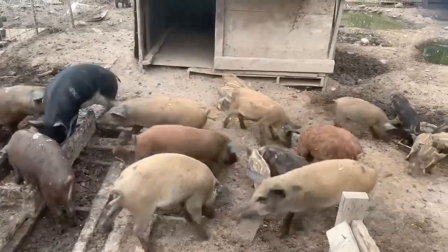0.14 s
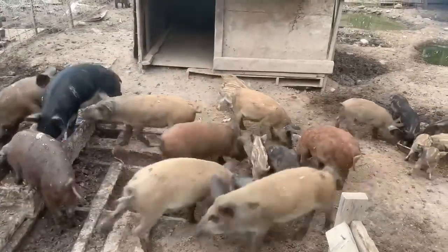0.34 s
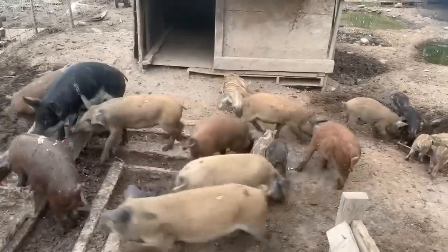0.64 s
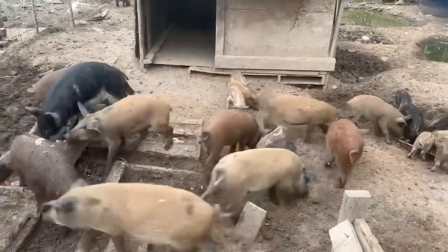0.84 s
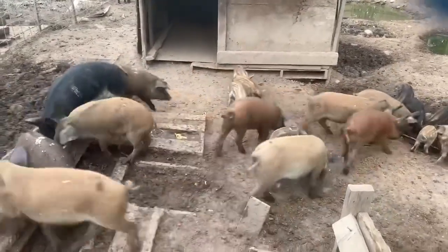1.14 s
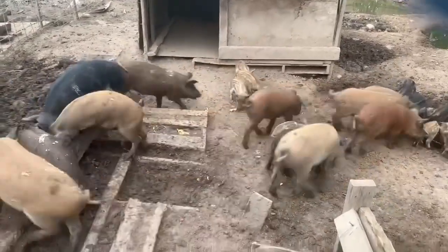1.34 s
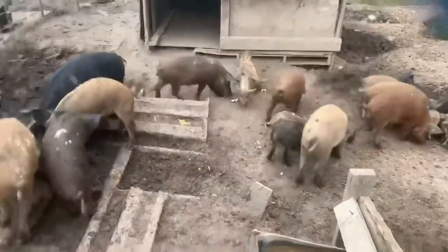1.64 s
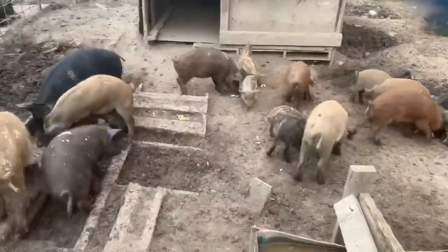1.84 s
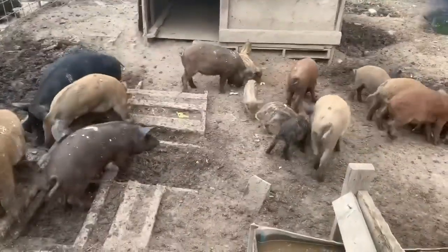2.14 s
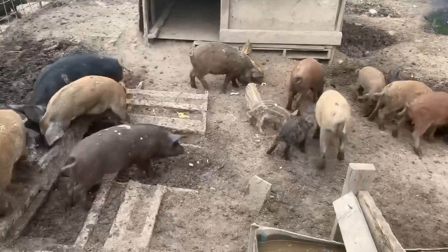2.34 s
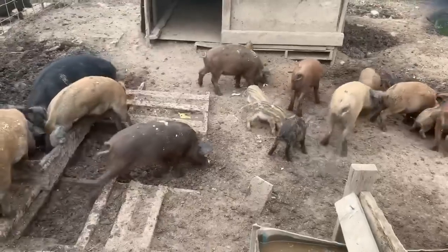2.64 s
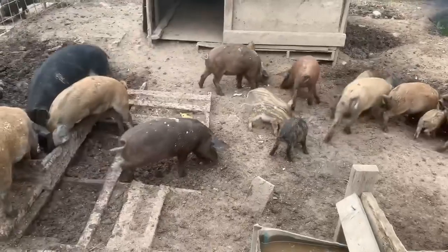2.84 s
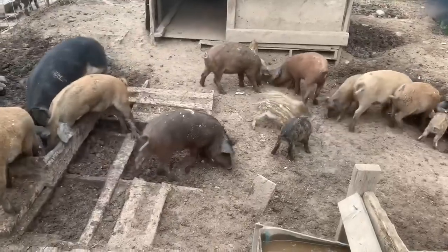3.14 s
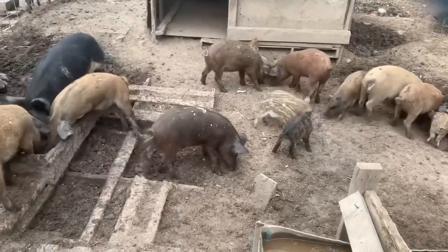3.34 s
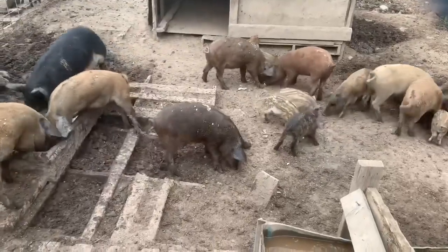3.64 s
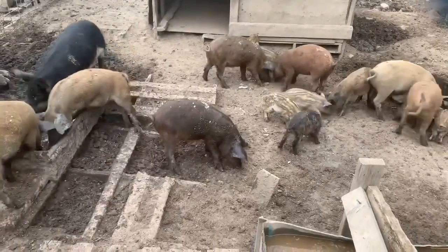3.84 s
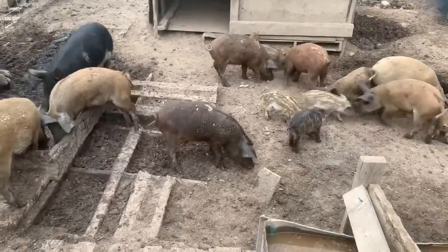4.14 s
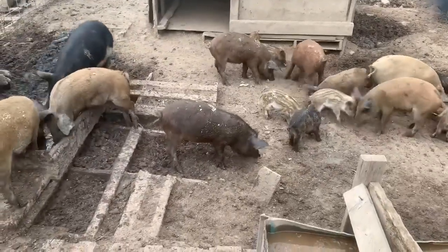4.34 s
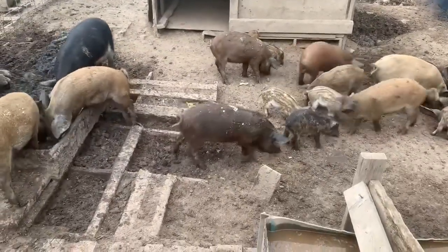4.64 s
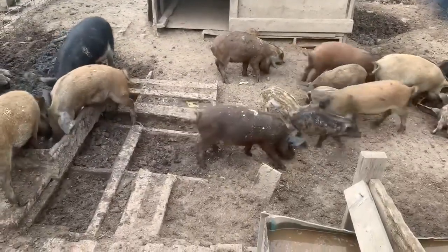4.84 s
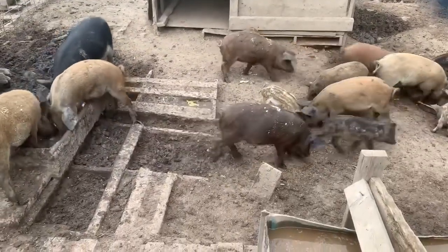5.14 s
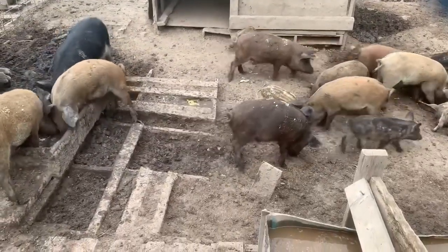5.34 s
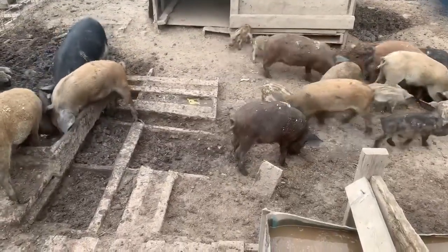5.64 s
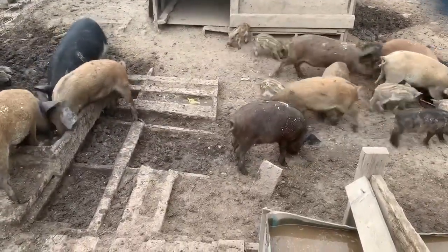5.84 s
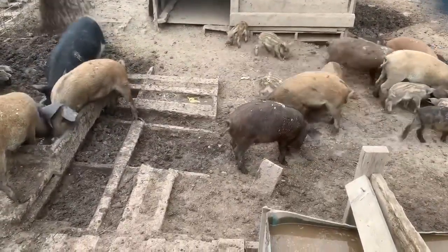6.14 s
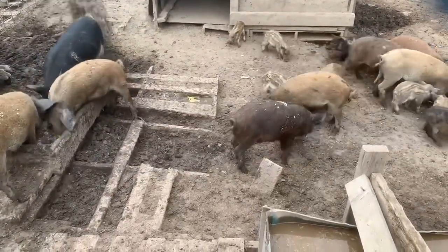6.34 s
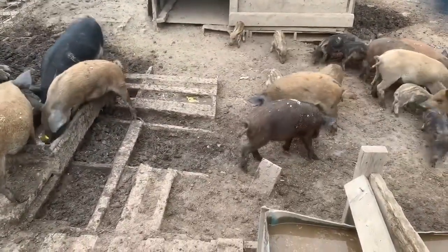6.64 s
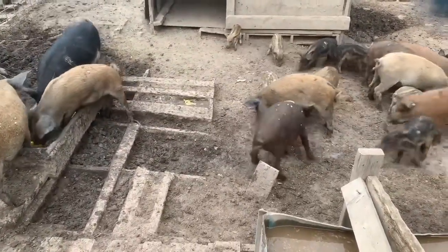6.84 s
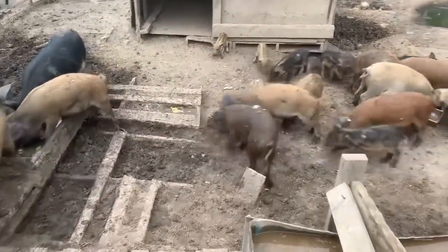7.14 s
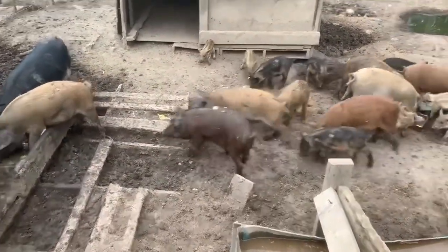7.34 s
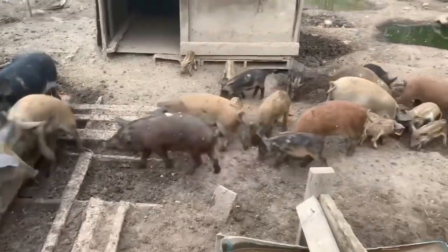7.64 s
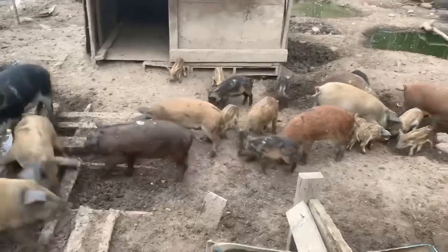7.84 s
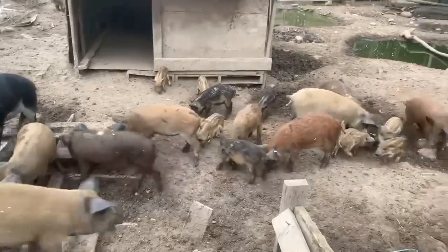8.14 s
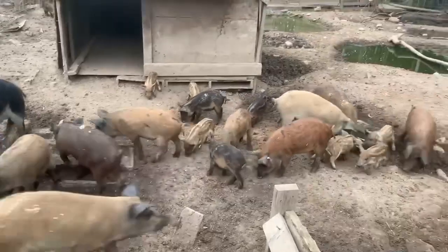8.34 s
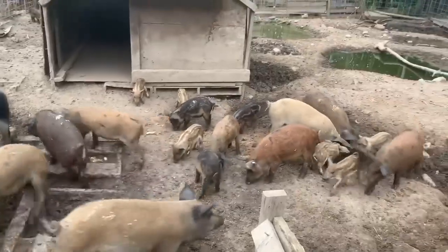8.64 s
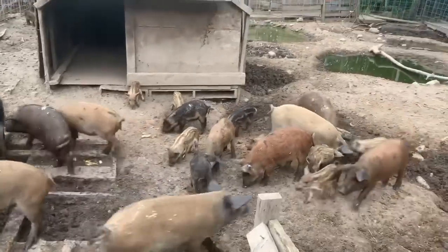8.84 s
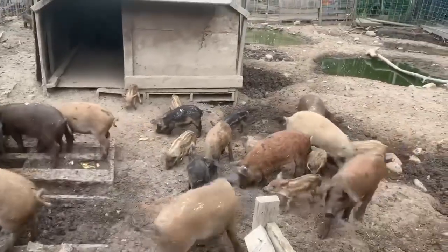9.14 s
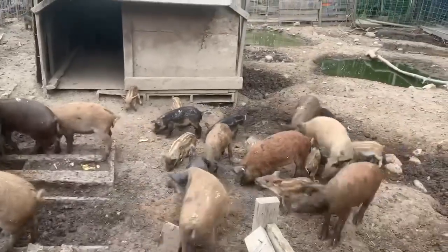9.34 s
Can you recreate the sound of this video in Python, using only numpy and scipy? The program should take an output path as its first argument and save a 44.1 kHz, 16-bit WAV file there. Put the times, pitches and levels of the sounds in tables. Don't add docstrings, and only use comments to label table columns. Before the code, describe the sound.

Outdoors, a herd of pigs feeds beside a wooden trough, heard close in stereo with very short echoes. A steady bed of deep murmuring, mid-pitched rooting rustle, faint airy sniffing and scattered tiny munches lasts throughout. From 0 to 1 s come wet smacks, a loud one on the right at 0.35, and brief raspy grunts from a younger pig. At 1.1 a loud crack, thump and clack hit wood; another wet smack follows at 1.3. Around 2 s a boomy knock meets a longer grunt and a cluster of smacks. Low fluttering grunts continue at 2.5, 2.8, 3.3, 4 and 4.4. Low smacks and dull knocks come at 5.2, a grunt at 5.7, then shorter grunts from 6.2 to 7.4. A bright, nasal squealing grunt sounds at 7.6-7.9. Rougher, faster-buzzing grunting comes at 8.3, softer at 8.7, coarse again at 9.1, and a sharp crack at 9.4.

```python
import sys
import numpy as np
from scipy import signal
from scipy.fft import rfft, irfft
from scipy.io import wavfile
from scipy.ndimage import uniform_filter1d

SR = 44100
rng = np.random.default_rng(int(sys.argv[2]) if len(sys.argv) > 2 else 0)


def nominal_scale(level):
    x = np.asarray(level, float) / 20
    return 10 ** x


def bounce(signal):
    frames = np.transpose(np.atleast_2d(signal))
    limited = np.clip(frames, -1, 1)
    pcm = np.round(limited * 32767).astype(np.int16)
    wavfile.write(sys.argv[1], SR, pcm)


N = 418509


def evened(x):
    return x / np.sqrt(np.mean(x ** 2) + 1e-20)


def read(points, hz):
    f, value = np.transpose(points)
    return np.interp(np.log(hz + 1), np.log(f + 1), value)


def resonate(x, hz, width):
    turn = np.exp(2j * np.pi * np.cumsum(hz * np.ones(len(x))) / SR)
    r = np.exp(-np.pi * width / SR)
    return 2 * (turn * signal.lfilter([1 - r], [1, -r], x / turn)).real


def add(mix, s, sound, late_ms, pan_db):
    treble = signal.lfilter([1, -1], [1, -.97], sound)
    bass = sound - treble
    for ear, side in enumerate((-1, 1)):
        ear_treble = nominal_scale(-side * pan_db / 2) * treble
        for piece, shift_s in ((bass, 0), (ear_treble, side * late_ms / 2000)):
            part = mix[ear, round((s + shift_s) * SR):][:len(piece)]
            part += piece[:len(part)]


def crowd(spectrum, level_db, follows, patchy_db, gusty_db, same):
    # start_s, level_db
    herd_busy = [(0, -48), (.5, -50), (1, -49), (1.5, -48.5), (1.9, -47.5), (2.42, -48), (2.78, -45),
                 (3.15, -49), (3.8, -46), (4.25, -48.5), (4.9, -50), (5.45, -47.5), (6.05, -47.5),
                 (6.75, -51), (7.09, -47.5), (8.1, -51), (8.98, -48.5), (9.49, -47)]
    frames, hz = N // 256 + 6, np.fft.rfftfreq(512, 1 / SR)
    a, b, c, d, patches = rng.standard_normal((frames, 257, 5)).T
    gusts = evened(uniform_filter1d(uniform_filter1d(patches, 90, 0), 2, 1))
    patches = evened(uniform_filter1d(uniform_filter1d(patches, 6, 0), 7, 1))
    left = a + 1j * b
    late = np.exp(-2j * np.pi * hz * 0.0002923 * (1 - np.exp(-(hz / 300) ** 2)))[:, None]
    share = np.clip(same + (1 - same) * np.exp(-(hz / 450) ** 2), 0, 1)[:, None]
    right = share * late * left + np.sqrt(1 - share ** 2) * (c + 1j * d)
    z = np.array([left, right])
    z *= nominal_scale(read(spectrum, hz)[:, None] + patchy_db * patches + gusty_db * gusts)
    noise = signal.istft(z, nperseg=512, noverlap=256)[1][:, :N]
    busy_db = np.interp(np.arange(N) / SR, *np.transpose(herd_busy)) + 48
    return nominal_scale(level_db + follows * busy_db) * evened(noise)


def herd_murmur():
    # pitch_hz, level_db
    murmur_shape = [(30, -45), (70, 5.5), (200, 3), (400, -9), (800, -13.5), (2000, -117)]
    return crowd(murmur_shape, level_db=-48, follows=1.0, patchy_db=4.5, gusty_db=-2.5, same=0.48)


def herd_rooting():
    # pitch_hz, level_db
    rooting_shape = [(150, -47), (400, -16.5), (650, -3.5), (1000, -8), (2000, -11), (3200, -19.5),
                     (6000, -25)]
    return crowd(rooting_shape, level_db=-50.5, follows=1.0, patchy_db=3.5, gusty_db=0.5, same=0.16)


def herd_sniffing():
    # pitch_hz, level_db
    sniffing_shape = [(1500, -12), (3000, -11), (4500, -4.5), (6500, -7.5), (8700, -14), (10300, -11.5),
                      (11200, -25.5), (12500, -37)]
    return crowd(sniffing_shape, level_db=-58.5, follows=0.1, patchy_db=4.5, gusty_db=1.5, same=0.34)


def smack(db, hz, t60, click_db):
    t = np.arange(2000) / SR
    noise = rng.standard_normal((len(t), 2)).T
    pop = 9 * (np.arange(len(t)) == 30)
    breath = noise[0] * nominal_scale(-60 * t / t60)
    ring = resonate(resonate(pop + breath, hz, 260), hz, 2450)
    click = resonate(noise[1], 4800, 7400) * nominal_scale(-60 * t / .016)
    return nominal_scale(db) * (ring / abs(ring).max() + nominal_scale(click_db) * click / abs(click).max())


def munching():
    out = np.zeros((2, N))
    for s, size, pitch, place in rng.random((150, 4)):
        sound = smack(-49 - 4.0 * np.log(size + .05), 500 * 18 ** pitch, .025, -18)
        add(out, .01 + 9.4 * s, sound, 0.48 * place - .3, 0)
    return out


def near_smacks(mix):
    # start_s, peak_db,
    # ring_hz, fade_s (by 60 dB), click_db (over the ring)
    smacks_left = [(0.1434, -35, 1440, 0.019, 8), (0.623, -41.5, 3200, 0.035, 5),
                   (0.8928, -31.5, 1420, 0.048, -17), (1.677, -32, 1040, 0.067, -13),
                   (1.716, -38, 1430, 0.035, -28), (1.8103, -35.5, 1370, 0.075, -27),
                   (1.8856, -37.5, 1420, 0.035, -2), (2.0198, -33, 1690, 0.049, -33),
                   (2.1047, -24.5, 2260, 0.032, -2), (2.2727, -33.5, 4770, 0.032, 2),
                   (2.3344, -29.5, 1770, 0.021, -10.5), (3.6185, -32, 1620, 0.032, -18),
                   (3.788, -38, 4480, 0.017, 0), (4.1139, -28, 2030, 0.049, -5.5),
                   (4.5635, -26, 1660, 0.037, -31), (4.6264, -29, 3050, 0.031, -7),
                   (5.9915, -37, 1360, 0.02, -24), (6.2297, -44, 4080, 0.035, -16),
                   (6.34, -29.5, 1880, 0.025, -14), (8.2125, -29, 1110, 0.025, -23),
                   (8.2407, -30, 1400, 0.021, -11), (8.7391, -29, 1500, 0.032, -3.5),
                   (8.81, -33, 1770, 0.023, -24)]
    smacks_ahead = [
        (0.0695, -27.5, 2210, 0.059, -13),
        (1.03, -28.5, 1860, 0.022, -27),
        (1.0794, -20.5, 810, 0.012, -8.5),
        (1.0944, -27, 806, 0.1, -2),
        (6.7839, -31.5, 1460, 0.023, -26),
        (7.131, -43, 1380, 0.036, -13),
        (9.383, -42.5, 4700, 0.023, 17),
        (9.3948, -22.5, 1400, 0.017, -2.5),
    ]
    smacks_right = [
        (0.3341, -35, 8200, 0.01, -16),
        (0.3462, -19, 1910, 0.019, -36),
        (0.5597, -29.5, 2170, 0.0057, -3.5),
        (1.276, -21, 1860, 0.027, -39),
        (5.1473, -31, 1000, 0.035, 2.5),
        (5.228, -27.5, 890, 0.12, -29),
    ]
    for smack_list, late_ms in ((smacks_left, .24), (smacks_ahead, .06), (smacks_right, -.28)):
        for s, *row in smack_list:
            add(mix, s, smack(*row), late_ms, 1.5)


def sniff(db, hz, width, length):
    air = rng.standard_normal(6000)[:int(length * SR)]
    return nominal_scale(db) * evened(resonate(resonate(air, hz, width), hz, width)) * np.hanning(len(air))


def near_sniffs(mix):
    # start_s, level_db, pitch_hz, width_hz, length_s
    sniff_list = [(.15, -54, 5500, 3000, .06), (1.38, -58, 7000, 3000, .08), (3.76, -53, 2500, 2500, .07),
                  (4.335, -48, 3600, 800, .08), (7.33, -52, 7500, 7000, .13), (7.12, -52, 10000, 3000, .02),
                  (.712, -32, 2100, 600, .045), (.705, -35, 1450, 300, .05), (9.38, -51, 9500, 3000, .04),
                  (6.781, -42, 1400, 250, .02), (8.4, -58, 9500, 3000, .06), (1.27, -44, 3900, 1200, .02),
                  (7.58, -57, 9000, 4000, .06)]
    for s, *row in sniff_list:
        add(mix, s, sniff(*row), .2, 0)


def grunt(row, voice):
    pig_voices = {"young": ((1510, 1880, 3870), (1, -10, -35), -22, 0, -0.24), "hog": ((1610, 2910, 3360),
                  (-1.6, -3.5, -19.5), -11, 0, 0.38), "old": ((1940, 2960, 3350), (-12.5, -14.5, -32.5),
                  -13.5, 4.9, 0.3), "gilt": ((1760, 2210, 3050), (1.6, -17, -19), -7, -8.5, .34),
                  "sow": ((1650, 1980, 2630), (-11.5, -13.5, -21.5), -15, 1.3, 0.31),
                  "far": ((1350, 2270, 1900), (-12, -4, -24), -12, 0.67, 0.27), "boar": ((1550, 2860, 3220),
                  (-5, -10, -28), -8.5, 9.5, 0.37), "squealer": ((1800, 2430, 3080), (-1.5, 3.1, -5),
                  -2.2, 4.4, 0.28)}
    snout_bends = {"young": 0, "hog": 0.026, "gilt": 0.1, "old": -0.21, "sow": -0.048, "far": 0.036, "boar":
                   0.03, "squealer": 0.033}
    first, length, share, effort_db, open_db = row
    pig, rate0, rate1, rough, chest_hz = voice
    snout_hz, (mid_db, top_db, edge_db), nasal_db, gains_db, late_ms = pig_voices[pig]
    t = np.arange(first - .025, first + length + 0.028, 1 / SR)

    top = np.clip(share, .02, .95) * length
    swell_db = np.interp(t - first, [-.02, top, length], [max(-101 * top, -18), 0, -11.5])
    nose_follows, snout_follows = 0.4, 0.95
    nose_db = nasal_db + (nose_follows - 1) * swell_db
    snout_db = open_db + (snout_follows - 1) * swell_db
    snout_db += gains_db * np.clip((t - first - top) / (length - top), 0, 1)

    chance = rng.standard_normal((22000, 4))[:len(t)].T
    jitter = 1 + rough * uniform_filter1d(chance[0], 400)
    turns = np.cumsum(np.interp(t - first, [0, length], [rate0, rate1]) * jitter) / SR
    turns += 10 - np.interp(first - .003, t, turns)
    luck = rng.standard_normal((80, 11))[turns.astype(int)].T
    slaps = nominal_scale(1.5 * luck[0]) * np.diff(np.floor(turns), prepend=np.floor(turns[0]))
    since = turns % 1
    puffs = nominal_scale(1.5 * luck[0]) * (since * np.exp(1 - since / .1) / .1 + 3 * rough ** 3)
    low = (1 - rough) * evened(slaps) + 2.0 * rough * evened((puffs + 7.2) * chance[1])
    air = evened(puffs * chance[2]) + (.9 - rough) * evened(np.roll(slaps, 60))

    chest = evened(resonate(resonate(low, chest_hz, 15 + .2 * chest_hz), chest_hz, 200))
    belly = evened(resonate(resonate(low, 79.5, 36), 76.6, 92))
    chest += nominal_scale(2.5 - 0.022 * chest_hz) * belly
    chest += nominal_scale(-5.0) * evened(resonate(resonate(low, 245.0, 31.4), 263, 160))
    nose = resonate(resonate(low + air, 554, 87), 803, 390)

    bend = snout_bends[pig] * np.sin(np.pi * np.clip((t - first) / length, 0, 1))
    tubes_hz = snout_hz + (1.107 * snout_hz[2], 5300)
    tubes_db = (0, mid_db, top_db, top_db - 1.5, edge_db)
    snout = 0
    for hz, db, loud_luck, pitch_luck in zip(tubes_hz, tubes_db, luck[1:], luck[6:]):
        tube_bend = bend * (hz < 3000)
        tube = resonate(air, hz * (1 + .025 * pitch_luck + tube_bend), 240)
        snout = snout + nominal_scale(db + 2.0 * loud_luck) * resonate(tube, hz * (1 + tube_bend), 700)
    broad_hiss = evened(resonate(resonate(puffs * chance[3], 2140, 3600), 2100, 3800))
    snout = evened(snout) + nominal_scale(-10) * broad_hiss

    sound = evened(chest) + nominal_scale(nose_db) * evened(nose) + nominal_scale(snout_db) * snout
    shut = signal.windows.tukey(len(t), 0.044 / (t[-1] - t[0]))
    return t[0], nominal_scale(effort_db + swell_db) * sound * shut, late_ms


def grunts(mix):
    # start_s (first slap), length_s, loudest_share (of the length), effort_db, open_snout_db (over chest)
    grunt_list = [(0.313, 0.1, 0.55, -36, -8), (0.558, 0.13, 0.22, -47, -8), (0.708, 0.056, 0.55, -32, -1),
                  (0.807, 0.114, .27, -42, -8.5), (1.229, .22, 0.27, -36.5, -8), (2.039, .3, 0.19, -38, -4),
                  (2.516, 0.13, 0.45, -34.5, -6), (2.835, 0.13, 0.18, -38, -10.5),
                  (3.275, 0.34, 0.29, -33.5, -5), (3.952, 0.18, 0.47, -33.5, -10.5),
                  (4.426, 0.28, 0.49, -32, -11.5), (5.654, .16, 0.74, -33.5, -7),
                  (6.242, .14, 0.34, -40, -8.5), (6.546, 0.11, 0.82, -43.5, -4.5),
                  (6.874, 0.14, 0.69, -37, -2), (7.148, 0.14, 0.7, -39.5, -10),
                  (7.363, 0.3, 0.47, -37.5, -11.5), (7.592, .35, 0.51, -39, 4.5),
                  (8.352, 0.29, 0.27, -33, -13), (8.701, 0.25, 0.078, -42.5, -8.5),
                  (9.09, 0.3, 0.24, -35, -11), (8.261, 0.067, 0.67, -40.5, -10.5)]
    # pig, start_flutter_hz, end_flutter_hz, roughness (0-1), chest_hz
    voice_list = [("young", 90, 90, .7, 363), ("far", 27.5, 39, .6, 85), ("young", 90, 95, .7, 340),
                  ("far", 24, 25, .6, 102), ("sow", 23.5, 22, .6, 318), ("gilt", 42, 44, .3, 165),
                  ("hog", 28.5, 35, .25, 106), ("far", 22, 26.5, .5, 172), ("old", 45, 33, .35, 120),
                  ("hog", 33, 40, .28, 97), ("sow", 40.5, 27, .3, 128), ("hog", 27, 39, .25, 105),
                  ("old", 27, 33, .35, 142), ("far", 29.5, 30, .5, 136), ("hog", 29, 35, .25, 140),
                  ("far", 34.5, 22.5, .5, 134), ("boar", 34, 34, .33, 156), ("squealer", 62, 73, .5, 190),
                  ("boar", 67, 63, .38, 134), ("sow", 22, 31.5, .6, 196), ("boar", 33.5, 43, .4, 121),
                  ("far", 40, 40, .5, 110)]
    for row, voice in zip(grunt_list, voice_list):
        add(mix, *grunt(row, voice), 3.0)


def knock(db, hz, t60, rise):
    t = np.arange(8000) / SR
    modes = np.zeros(len(t))
    for ratio, mode_db in ((.65, 0.5), (1, 12), (1.8, 6), (3.1, 1)):
        modes += nominal_scale(mode_db) * np.sin(2 * np.pi * hz * ratio * t) * nominal_scale(-60 * ratio * t / t60)
    modes *= 1 - np.exp(-(t / rise) ** 2)
    return nominal_scale(db) * modes / abs(modes).max()


def knocks(mix):
    # start_s, peak_db, pitch_hz, fade_s (by 60 dB), rise_s
    board_knocks = [
        (1.096, -20.5, 229, 0.083, 0.0029),
        (1.676, -32.5, 310, 0.015, 0.0036),
        (2.036, -26.5, 179, 0.3, 0.0041),
        (2.753, -25.5, 259, 0.055, 0.0062),
        (5.148, -34, 120, 0.15, 0.0034),
        (5.187, -26.5, 233, 0.06, 0.0029),
        (5.228, -24.5, 304, 0.052, 0.004),
        (6.235, -33, 225, 0.075, 0.0042),
        (8.785, -32.5, 218, 0.097, 0.0053),
    ]
    rim_clacks = [
        (1.081, -21.5, 595, 0.014, 0.0033),
        (2.036, -28, 445, 0.136, 0.00069),
    ]
    for s, *row in board_knocks + rim_clacks:
        add(mix, s, knock(*row), .05, 0)


def pen(x):
    taps = np.zeros((2, 9000))
    at = np.arange(100, 8960, 20) + rng.integers(0, 20, (2, 443))
    np.put_along_axis(taps, at, rng.choice([-1., 1.], at.shape), 1)
    taps *= nominal_scale(-60 * np.arange(9000) / SR / .055)
    z = rfft(taps)
    taps = irfft(z / np.sqrt(uniform_filter1d(abs(z) ** 2, 25, axis=1)))
    taps = signal.sosfilt(signal.butter(2, 850, "high", fs=SR, output="sos"), taps)
    return signal.fftconvolve(x, taps / np.linalg.norm(taps[0]), axes=1)[:, :N]


def scene():
    herd = herd_murmur() + herd_rooting() + herd_sniffing()
    near = munching()
    near_smacks(near)
    near_sniffs(near)
    grunts(near)
    knocks(near)
    return near + nominal_scale(-2.5) * pen(near) + herd


def top_cut(x):
    return signal.sosfilt(signal.butter(12, 12290, fs=SR, output="sos"), x)


def record(dry):
    x = signal.sosfilt(signal.butter(2, 55, "high", fs=SR, output="sos"), dry)
    treble_cut = signal.firwin(511, 11350, window=("kaiser", 9), fs=SR)
    x = signal.oaconvolve(x, treble_cut[None], "same")
    return top_cut(x)


dry = scene()
out = record(dry)
bounce(out)
```